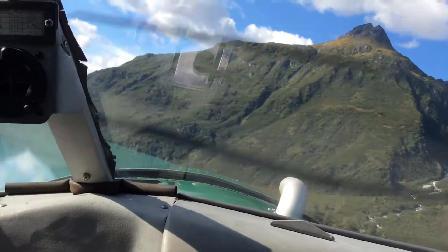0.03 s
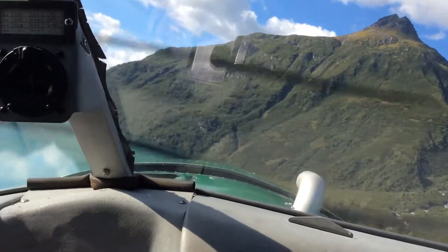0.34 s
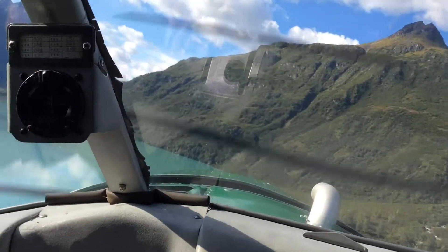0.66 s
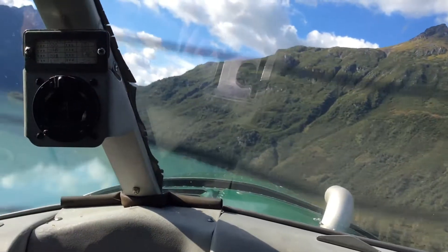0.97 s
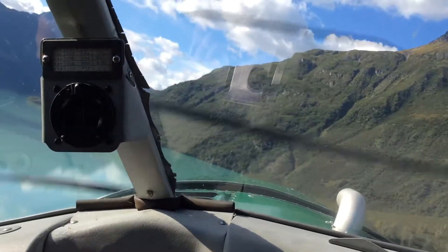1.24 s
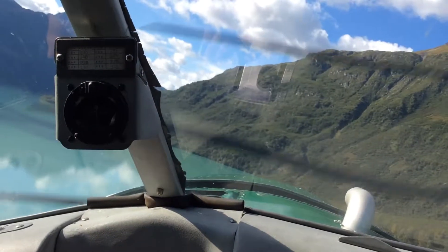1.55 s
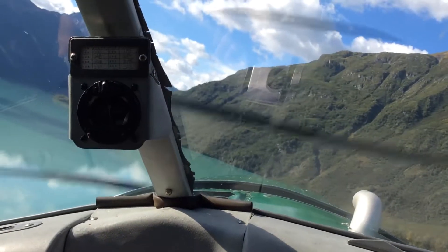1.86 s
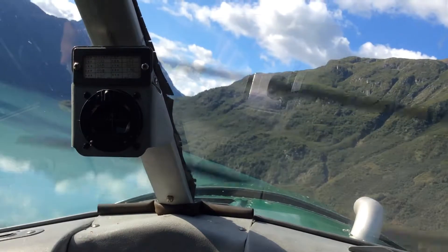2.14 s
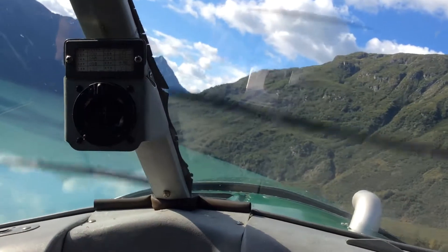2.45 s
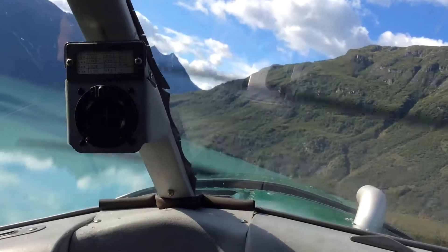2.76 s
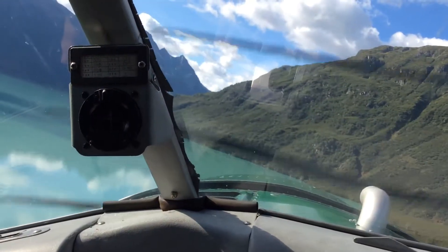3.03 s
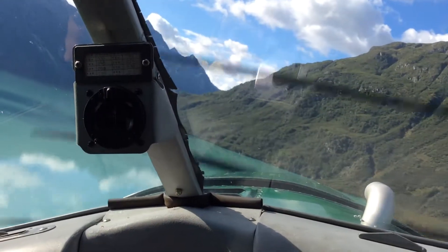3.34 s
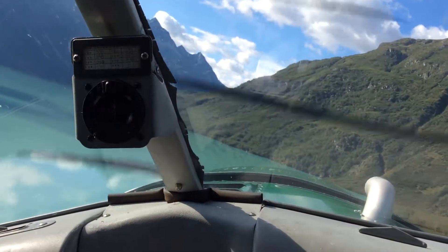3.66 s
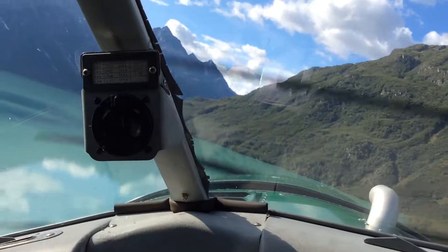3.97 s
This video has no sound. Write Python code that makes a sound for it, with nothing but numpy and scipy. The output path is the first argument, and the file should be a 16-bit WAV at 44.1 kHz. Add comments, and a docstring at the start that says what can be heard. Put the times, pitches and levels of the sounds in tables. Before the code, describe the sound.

A loud, deep propeller engine drone throbs at constant speed throughout, with a fluttering buzz and exhaust rasp on top. Low cabin rumble and faint air hiss run underneath, heard from inside a small plane's cockpit.

```python
"""A deep, throbbing drone fills the cockpit of a float plane in level flight.
It is the firings and propeller blades of a nine-cylinder radial engine at a steady 2050 rpm, sounding
on multiples of the engine cycle. The exhaust rasps in step and sets cabin fittings ringing, the airframe
rumbles and the slipstream hisses round the windscreen. A limiter holds the loudest throbs down."""
import sys
import numpy as np
from scipy import signal
from scipy.fft import rfft, irfft
from scipy.io import wavfile
from scipy.ndimage import uniform_filter1d, minimum_filter1d

SR = 44100
rng = np.random.default_rng(int(sys.argv[2]) if len(sys.argv) > 2 else 0)


def master(y):
    """Save y as 16-bit WAV."""
    cut = np.clip(np.atleast_2d(y).T, -1, 1)
    pcm = np.round(cut * 32767)  # scale
    wavfile.write(sys.argv[1], SR, pcm.astype(np.int16))


N = 176400

CYLINDERS, GUSTS_PER_S = 9, 7
RASP_FROM_HZ, HISS_FROM_HZ = 414, 1600   # rumble below, exhaust rasp between, slipstream above


def engine(angle, drone_trim_db=.1, buzz_trim_db=-1):
    """Firings and propeller blades: a solid, deep drone with a fluttering buzz on top."""
    # The body: 9 and 18 are the firing rate and its octave, the rest comes from unequal cylinders
    # and the blades. Columns: cycle_multiple, level_db (rms, before the trim)
    drone_partials = [(4, -34), (5, -33.2), (6, -25), (7, -25), (8, -25), (9, -10), (10, -31.5), (11, -14),
                      (12, -20.5), (13, -33), (14, -30), (15, -40), (16, -36.5), (18, -22.5), (19, -39.5),
                      (20, -54), (21, -51.5), (22, -38), (23, -30.5), (24, -31), (25, -29.5), (26, -39.5),
                      (27, -35), (28, -39), (29, -43.5), (30, -45.5), (31, -48.5), (33, -38.5), (34, -39),
                      (35, -45.5), (36, -36)]
    # Higher partials that stand out as a buzz: cycle_multiple, level_db (rms, before the trim)
    buzz_partials = [(37, -45), (41, -46), (42, -44.5), (45, -50), (48, -48), (51, -47.2), (52, -44),
                     (55, -40.5), (56, -42), (57, -45.5), (68, -48), (72, -42)]
    drone = from_db(drone_trim_db) * partials(drone_partials, angle, flutter=.04)
    buzz = from_db(buzz_trim_db) * partials(buzz_partials, angle, flutter=.38)
    return drone + buzz + fine_buzz(angle, first_multiple=round(buzz_partials[-1][0]) + 1)


def engine_angle(jitter_rad=.005, jitters_per_s=6):
    """Radians through the four-stroke cycle (two crank turns), nudged by uneven combustion."""
    # Cruising speed, barely wandering: time_s, speed_rpm
    engine_speed = [(0, 2051.1), (1.6, 2050), (2.8, 2052), (3.5, 2048.4), (4, 2050)]
    time_s, speed_rpm = np.transpose(engine_speed)
    cycles_per_s = np.interp(np.arange(N) / SR, time_s, speed_rpm) / 120
    return 2 * np.pi * np.cumsum(cycles_per_s) / SR + jitter_rad * drift(jitters_per_s)


def partials(rows, angle, flutter, flutters_per_s=4.3):
    """Sines locked to the engine, each fluttering in level and phase."""
    out = np.zeros(N)
    for multiple, level_db in rows:
        phase = np.round(multiple) * angle + rng.uniform(0, 2 * np.pi)
        tone = (1 + flutter * drift(flutters_per_s)) * np.cos(phase)
        phase_flutter = flutter * drift(flutters_per_s) * np.sin(phase)
        out += from_db(level_db) * (tone + phase_flutter)
    return np.sqrt(2) * out


def fine_buzz(angle, first_multiple, start_db=-55, fall_db_per_octave=7, scatter_db=2.5):
    """A faint edge above the buzz: a comb of uneven partials, repeating every engine cycle."""
    count, size = 80, 8192
    multiples = first_multiple + np.arange(count)
    slope_db = start_db - fall_db_per_octave * np.log2(multiples / first_multiple)
    level_db = slope_db + scatter_db * rng.standard_normal(count)
    comb = np.zeros(size // 2 + 1, complex)
    comb[multiples] = from_db(level_db) * np.exp(2j * np.pi * rng.random(count))
    one_cycle = irfft(comb) * size / np.sqrt(2)
    return np.interp(angle / (2 * np.pi), np.arange(size) / size, one_cycle, period=1)


def exhaust(angle, cycle_depth=.14, firing_depth=.08, trim_db=-.1, gust_db=.5):
    """Rough gas noise that swells with each firing and once per cycle, and burbles now and then."""
    # Brief burbles of the exhaust: peak_s, lift_db
    burbles = [(.11, 3.5), (.41, 1), (1.045, 2), (1.26, 2), (2.15, 2), (3.82, 3), (3.95, 1)]
    pulsing = 1 - cycle_depth * np.cos(angle) + firing_depth * np.cos(CYLINDERS * angle)
    gain_db = trim_db + lifts(burbles, width_s=.014) + gust_db * drift(GUSTS_PER_S)
    return from_db(gain_db) * pulsing * turbulence(RASP_FROM_HZ, HISS_FROM_HZ)


def airframe(trim_db=.1, gust_db=.7):
    """Low rumble of the buffeted cabin panels."""
    # Gentle swells of the rumble: peak_s, lift_db
    swells = [(2.05, 1.5), (3.2, 2.5), (3.72, 2)]
    gain_db = trim_db + lifts(swells, width_s=.14) + gust_db * drift(GUSTS_PER_S)
    return from_db(gain_db) * turbulence(18, RASP_FROM_HZ)


def slipstream(angle, pulse_depth=.066, gust_db=.1):
    """Even hiss of air round the windscreen, pulsing faintly with the engine."""
    pulsing = 1 - pulse_depth * (np.cos(angle) + np.cos(2 * angle))
    return from_db(gust_db * drift(GUSTS_PER_S)) * pulsing * cockpit(turbulence(HISS_FROM_HZ, SR))


def fittings(swing_db=4.5, swings_per_s=4):
    """Narrow rings of cabin parts, shaken by the exhaust in short flutters."""
    # Resonances of the fittings: pitch_hz, width_hz, level_db (rms, at the middle of the swing)
    resonances = [(715, 45, -43), (2670, 110, -53.5), (4060, 70, -58), (4450, 110, -58)]
    out = np.zeros(N)
    for pitch_hz, width_hz, level_db in resonances:
        resonator = signal.iirpeak(pitch_hz, pitch_hz / width_hz, fs=SR)
        ring = signal.lfilter(*resonator, rng.standard_normal(N))
        out += from_db(level_db + swing_db * drift(swings_per_s)) * ring / ring.std()
    return out


def cockpit(hiss, reflection_db=-21, longest_delay_s=.007, sway_s=.00005, sways_per_s=.32):
    """Panels colour the hiss; six close reflections add a ripple that shifts as the microphone sways."""
    # Panel and windscreen resonances: centre_hz, width_hz, lift_db
    panels = [(2220, 56, 2), (2680, 180, 1.5), (2920, 77, 0), (3990, 67, 1.5), (4400, 97, 1),
              (4930, 110, 0), (7500, 180, 1.5)]
    hz, samples = np.arange(N // 2 + 1) * SR / N, np.arange(N)
    lift_db = sum(db / (1 + (2 * (hz - centre) / width) ** 2) for centre, width, db in panels)
    coloured = irfft(rfft(hiss) * from_db(lift_db), N)
    reflections = np.zeros(N)
    for delay_s in longest_delay_s * rng.uniform(.1998, 1, 6):
        swaying_delay_s = delay_s + sway_s * drift(sways_per_s)
        reflections += np.interp(samples - SR * swaying_delay_s, samples, coloured)
    return coloured + from_db(reflection_db) * reflections


def turbulence(low_hz, high_hz):
    """The band of the cabin's noise bed that lies between two crossover points."""
    # Turbulent noise in the cabin, heaviest in the bass: frequency_hz, density_db (in a 1 Hz band)
    noise_spectrum = [(20, -63.6), (35, -57), (60, -46), (100, -41.5), (140, -41.5), (190, -42.5),
                      (250, -48), (340, -49.5), (430, -52), (520, -54.5), (620, -52), (720, -51),
                      (820, -57), (1000, -58.5), (1300, -59.5), (1900, -66.5), (2700, -63.5), (4300, -64),
                      (5500, -67), (6800, -72.5), (9000, -72), (12000, -75.5), (15000, -79)]
    frequency_hz, density_db = np.transpose(noise_spectrum)
    hz = np.maximum(np.arange(N // 2 + 1) * SR / N, 1)
    density = from_db(np.interp(np.log(hz), np.log(frequency_hz), density_db))
    band = 1 / ((1 + (low_hz / hz) ** 8) * (1 + (hz / high_hz) ** 8))
    return irfft(rfft(rng.standard_normal(N)) * density * np.sqrt(band * SR / 2), N)


def lifts(rows, width_s):
    """Bell-shaped bumps of level over time, in dB."""
    t = np.arange(N) / SR
    return sum(lift_db * np.exp(-.5 * ((t - peak_s) / width_s) ** 2) for peak_s, lift_db in rows)


def drift(rate):
    """A smooth random wander with spread 1, changing about `rate` times a second."""
    pole = np.exp(-200 * np.pi * rate / SR)
    noise = rng.standard_normal(N // 100 + 2002)   # one value per 100 samples, plus a run-in
    slow = signal.lfilter([1], [1, -2 * pole, pole * pole], noise)[2000:]
    return np.interp(np.arange(N) / 100, np.arange(len(slow)), slow / slow.std())


def from_db(db):
    """Decibels to gain."""
    return 10 ** (np.asarray(db) / 20)


def scene():
    """All sources at one microphone behind the windscreen."""
    angle = engine_angle()
    return (engine(angle) + exhaust(angle) + airframe() + fittings() + slipstream(angle))[None]


def record(dry, limit_db=-.2, attack_s=.003, release_db_per_s=56, cutoff_hz=15300):
    """A look-ahead limiter ducks the highest peaks and recovers; a steep low-pass cuts the top."""
    over_db = np.maximum(20 * np.log10(np.abs(dry[0]) + 1e-9) - limit_db, 0)
    release_ramp = release_db_per_s * np.arange(N) / SR
    gain_db = release_ramp - np.maximum.accumulate(over_db + release_ramp)
    span = 2 * int(attack_s * SR / 2) + 1
    smooth_gain_db = uniform_filter1d(minimum_filter1d(gain_db, span), span)
    low_pass = signal.ellip(12, .1, 80, cutoff_hz, fs=SR, output="sos")
    return signal.sosfilt(low_pass, dry * from_db(smooth_gain_db))


dry = scene()
out = record(dry)
master(out)
```